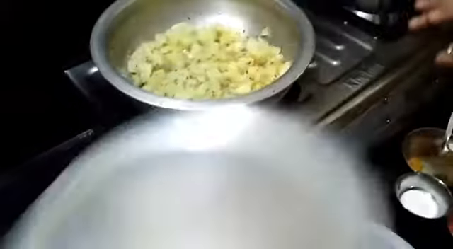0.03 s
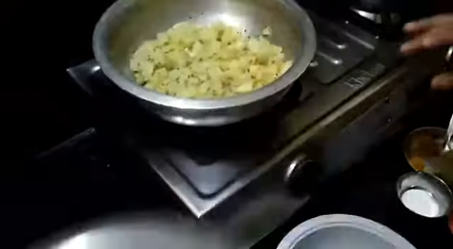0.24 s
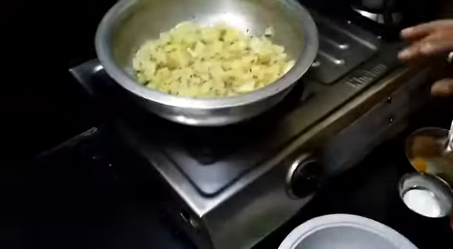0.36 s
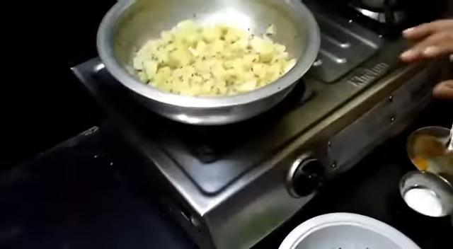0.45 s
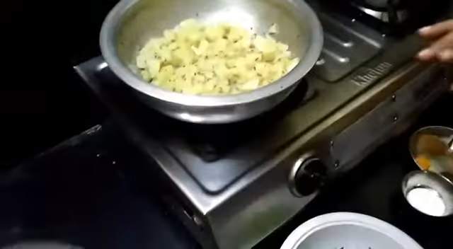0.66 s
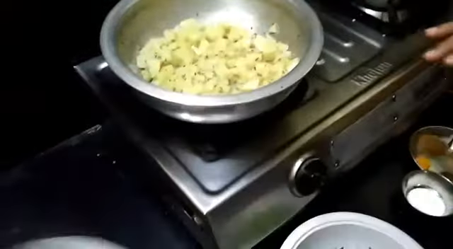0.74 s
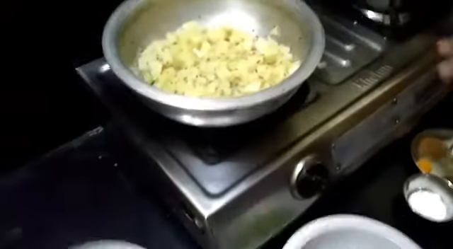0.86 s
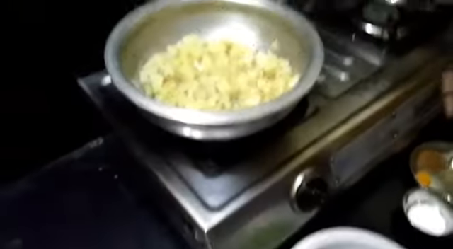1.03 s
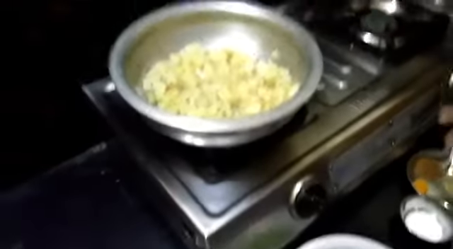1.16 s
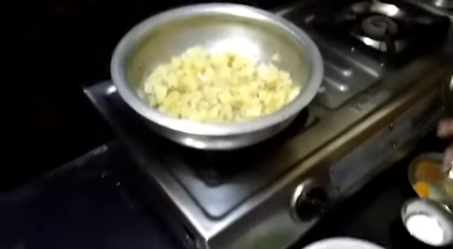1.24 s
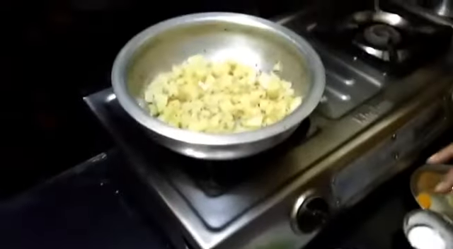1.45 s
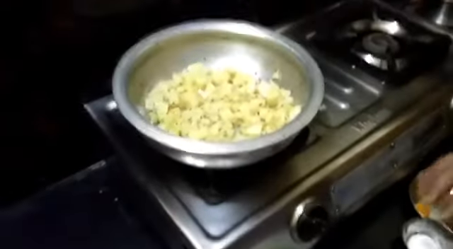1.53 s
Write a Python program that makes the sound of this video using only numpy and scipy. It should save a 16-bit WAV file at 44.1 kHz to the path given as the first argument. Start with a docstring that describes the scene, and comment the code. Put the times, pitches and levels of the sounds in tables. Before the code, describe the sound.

Metal lid clanking loudly against a pan rim, knocking, scraping and landing over a faint sizzle

```python
"""A small, hard-walled kitchen, close microphone: a metal lid comes off a softly sizzling pan.
The lid clanks and rings, knocks and scrapes the pan's rim, then lands on other metalware and slides a little.
Clicks of contact force drive three ringing bodies, each made of decaying modes and dense, decaying noise.
Single notes, a skidding rim and dull bumps join them; the sizzle is coloured noise and tiny crackles.
The room adds a short diffuse tail, and the microphone's limiter flattens each attack."""
import sys
import numpy as np
from scipy import signal
from scipy.fft import rfft, irfft
from scipy.io import wavfile
from scipy.ndimage import uniform_filter1d, minimum_filter1d

SR = 44100
rng = np.random.default_rng(int(sys.argv[2]) if len(sys.argv) > 2 else 0)


def unload_audio(sound):
    """Save the sound as a 16-bit wav file, at the path given as the first command line argument."""
    columns = np.transpose(np.atleast_2d(sound))
    # keep every value between -1 and 1, then stretch to whole-number steps
    steps = np.round(np.clip(columns, -1, 1) * 32767)
    wavfile.write(sys.argv[1], SR, steps.astype(np.int16))


N = 70560
T = np.arange(N) / SR  # time in seconds

# spectrum of the sizzling food over the quiet room: pitch_hz, relative density_db (per Hz)
SIZZLE_SPECTRUM = [(70, -2), (200, -5.5), (450, -14), (1200, -17.5), (3000, -23), (4400, -17), (5500, -7),
                   (6600, -0.5), (8000, -9), (10000, -19.5), (14000, -18)]
HISS_START_DB, CRACKLE_START_DB, SIZZLE_RISE_DB_PER_S = -60.5, -69, 4.5
CRACKLES_PER_S, CRACKLE_SPREAD_DB = 340, 3

# the room's diffuse tail: level, decay by 60 dB, and silence ahead of it
ROOM_DB, ROOM_T60_S, ROOM_GAP_S = -15.5, 0.58, 0.0037

# dull bumps as things are handled: centre_s, half_length_s (down to 1/e), level_db
HANDLING_BUMPS = [(0.761, 0.076, -55.5), (1.011, 0.043, -55)]
BUMP_HZ = 215

# knocks on held or pressed metal, each one note: start_s, pitch_hz, level_db, t60_s
HELD_KNOCKS = [(0.7888, 936, -10.5, 0.012), (1.141, 870, -59.5, 0.44), (1.143, 3520, -59.5, 0.095),
               (1.482, 1966, -41, 0.049)]

# the rim's skid in the first clank: start_s, length_s, from_hz, to_hz, level_db
RIM_SKID = (0.2035, 0.033, 7500, 4400, -17)
SKID_WIDTH_HZ = 950

# modes of the lid, the pan and the metalware under the lid: pitch_hz, level_db, t60_s
LID_MODES = [(972, -18, .5), (1577, -29, 0.47), (4529, -31, 0.46), (5064, -33, 0.5), (6358, -26.5, 0.34),
             (268.5, -34.4, 0.62), (826, -39, 0.56), (1375, -35.5, 0.62), (1903, -30, 0.29),
             (3284, -31, 0.2), (3542, -36.1, 0.33), (4145, -43, 0.35), (4678, -42.5, 0.42),
             (4942, -37, 0.3), (5658, -34.4, 0.3), (6578, -25.5, 0.16), (7138, -33.4, 0.32)]
PAN_MODES = [(1930, -39.5, 0.32), (3260, -41, 0.3), (4000, -28.5, 0.14), (4086, -26, 0.16),
             (267.1, -31.5, 0.24), (535, -36.8, 0.31), (968, -29.5, 0.23), (1380, -36.5, 0.35),
             (2299, -41.4, 0.29), (2560, -40.4, 0.3), (2870, -44, 0.35), (5580, -21.4, 0.13),
             (6450, -26.4, 0.17), (6578, -23.1, 0.21)]
WARE_MODES = [(255, -40, 0.5), (715, -30, 0.3), (807, -29.5, 0.42), (63.2, -57, 1.3), (941, -36.1, 0.25),
              (1410, -33, 0.25), (2540, -32.5, 0.24), (3310, -29.5, 0.19), (4840, -34.5, 0.32),
              (6250, -36.1, 0.34), (6585, -26.1, 0.19), (7060, -28.1, 0.23), (7378, -30.1, 0.23)]
# modes split by the uneven metal: spread_hz (the furthest twins lie at twice this), twin_level_db
LID_SPLIT = (9, -21)
PAN_SPLIT = (24, -1)
WARE_SPLIT = (22, -1)
# spectrum of each body's crowd of weaker modes: pitch_hz, relative density_db (per Hz)
LID_CROWD_SPECTRUM = [(50, -24), (100, -0.5), (260, -4), (500, -2.5), (880, 2.8), (1300, -2), (2300, -8.5),
                      (3400, -4), (4700, -2.9), (6700, 4), (8000, 0.2), (9600, -6.9), (14000, -14.5)]
PAN_CROWD_SPECTRUM = [(35, -24), (70, -15), (230, 2), (450, -1.4), (850, 3), (1600, -13), (3400, -4.5),
                      (5600, 4), (6700, 9), (8000, -2), (9600, -7.5), (14000, -10.6)]
WARE_CROWD_SPECTRUM = [(40, -30), (100, -7), (400, -19), (800, -4), (1300, -5), (1700, -6.5), (3700, -6),
                       (5000, -0.4), (7000, 2.5), (8200, -4.5), (9600, -12), (14000, -21)]
# decay of each crowd: level_db, bass_t60_s, treble_t60_s
LID_CROWD_DECAY = (-19.5, 0.68, 0.17)
PAN_CROWD_DECAY = (-17, 0.35, 0.1)
WARE_CROWD_DECAY = (-19.5, 0.41, 0.21)
BLOOM_S = 0.017  # time constant with which the clear modes build up

# blows: start_s, lid_level_db, pan_level_db, ware_level_db, low_end_db
CONTACT_BLOWS = [(0.2036, 6.5, -38, -77, -13), (0.7887, -35, 4.3, -41, -3.3), (0.838, -22, -6.5, -60, -0.5),
                 (0.851, -17, -6, -44, -13), (0.865, -26, -11, -15, -4.3), (1.142, -46, -25, -34.5, -12.5),
                 (1.227, -31, -43, -19.5, -5), (1.2548, -17.5, -10.5, 0.65, -2.5),
                 (1.358, -36, -55, -31, -4), (1.481, -54, -30, -22.5, -1.8)]
# scrapes: start_s, length_s, lid_level_db, pan_level_db, ware_level_db, low_end_db
CONTACT_SCRAPES = [(0.211, 0.023, -10, -10, -10, -17), (0.8, 0.023, -26.5, -18.5, -49, 4),
                   (0.822, 0.047, -18, -6, -8, -5), (1.13, 0.013, -59, -35.5, -36, -24),
                   (1.257, 0.066, -20, -12.5, -14, -1.4), (1.374, 0.11, -72, -42.5, -30.5, 7.5),
                   (1.436, 0.16, -48, -18.5, -15, -7.5)]
SLIPS_PER_S, SLIP_SPREAD_DB = 600, 5
LOW_END_HZ = 4250  # corner below which low_end_db acts

# microphone and limiter
CEILING_DB, RELEASE_DB_PER_S, LIMITER_ATTACK_S = -11.5, 294, 0.00035
LOW_CUT_HZ, CUTOFF_HZ = 41, 14350


def from_db(db):
    """Decibels to gain."""
    return 10 ** (np.asarray(db) / 20)


def rms_one(x):
    """Scale to unit power."""
    return x / np.sqrt(np.mean(x ** 2) + 1e-20)


def convolve(x, response):
    """Pass a signal through an impulse response."""
    return signal.fftconvolve(x, response)[:N]


def filtered(x, order, hz, kind="low"):
    """Butterworth filter."""
    return signal.sosfilt(signal.butter(order, hz, kind, fs=SR, output="sos"), x)


def swell(along):
    """Rise and fall of a rubbing contact as it goes from 0 to 1."""
    return np.sqrt(np.abs(np.sin(np.pi * along)))


def colour(x, spectrum):
    """Give a signal a spectrum, at unit power."""
    hz, db = np.transpose(spectrum)
    bins = np.maximum(np.arange(N // 2 + 1) * SR / N, 1)
    gain = from_db(np.interp(np.log(bins), np.log(hz), db))
    return rms_one(irfft(rfft(x) * gain, N))


def clicks(rate, spread_db):
    """Randomly timed clicks of uneven size and sign."""
    sizes = from_db(spread_db * np.minimum(rng.exponential(1, N), 4))
    return (rng.random(N) < rate / SR) * sizes * rng.choice([-1, 1], N)


def sizzle():
    """Faint hiss with tiny crackles of the same colour, rising steadily in level."""
    hiss = from_db(HISS_START_DB) * colour(rng.standard_normal(N), SIZZLE_SPECTRUM)
    pops = clicks(CRACKLES_PER_S, CRACKLE_SPREAD_DB)
    crackle = from_db(CRACKLE_START_DB) * colour(pops, SIZZLE_SPECTRUM)
    return (hiss + crackle) * from_db(SIZZLE_RISE_DB_PER_S * T)


def kitchen(x):
    """The short diffuse tail of a small hard room: decaying noise after a brief gap."""
    tail = rng.standard_normal(N) * from_db(-60 * T / ROOM_T60_S) * (T > ROOM_GAP_S)
    return from_db(ROOM_DB) * convolve(x, rms_one(tail) / np.sqrt(N))


def handling():
    """Soft low bumps as things are moved: band-limited noise that swells and fades."""
    rumble = filtered(rng.standard_normal(N), 2, [BUMP_HZ * 0.59, BUMP_HZ * 1.3], "band")
    level = sum(from_db(db) * np.exp(-((T - centre) / half) ** 2) for centre, half, db in HANDLING_BUMPS)
    return rms_one(rumble) * level


def knocks():
    """Where the metal is held or pressed, a knock gives one decaying note."""
    out = np.zeros(N)
    for start, hz, db, t60 in HELD_KNOCKS:
        age = np.maximum(T - start, 0)
        out += from_db(db - 60 * age / t60) * np.sin(2 * np.pi * hz * age)
    return out


def zing():
    """Rim skids along rim: a narrow band of friction noise that falls as the skid slows."""
    start, length, from_hz, to_hz, db = RIM_SKID
    along = np.clip((T - start) / length, 0, 1)
    grain = filtered(rng.standard_normal((2, N)), 2, SKID_WIDTH_HZ / 2)
    phase = 2 * np.pi * np.cumsum(from_hz + (to_hz - from_hz) * along) / SR
    band = rms_one(grain[0] * np.cos(phase) + grain[1] * np.sin(phase))
    return from_db(db) * band * swell(along)


def contacts():
    """Force on lid, pan and metalware: one click a blow, a swell of tiny slips a scrape."""
    touches = []
    for start, *levels in CONTACT_BLOWS:
        touches.append((1.0 * (np.arange(N) == int(start * SR)), levels))
    for start, length, *levels in CONTACT_SCRAPES:
        along = np.clip((T - start) / length, 0, 1)
        slips = clicks(SLIPS_PER_S, SLIP_SPREAD_DB) * swell(along)
        touches.append((rms_one(slips) / np.sqrt(N), levels))  # same energy as one click
    force = np.zeros((3, N))
    for touch, (lid_db, pan_db, ware_db, low_db) in touches:
        # each contact has its own share of bass, thinner or fuller
        lows = filtered(touch + 1e-18, 1, LOW_END_HZ)
        shaped = touch + (from_db(low_db) - 1) * lows
        force += np.outer(from_db([lid_db, pan_db, ware_db]), shaped)
    return force


def body(modes, split, crowd, decay):
    """A metal body's answer to a tap: clear modes with close twins, and a dense crowd whose treble dies first."""
    spread_hz, twin_db = split
    crowd_db, bass_t60, treble_t60 = decay
    out = np.zeros(N)
    for hz, db, t60 in modes:
        twins = np.zeros(N)
        for offset, turn in rng.uniform(-2, 2, size=(7, 2)):
            twin_hz = hz + spread_hz * offset * min(1, hz / 1000)  # low modes split less
            twins += np.sin(2 * np.pi * (twin_hz * T + turn)) / np.sqrt(7)
        ring = np.sin(2 * np.pi * hz * T) + from_db(twin_db) * twins
        out += from_db(db - 60 * T / t60) * ring
    out *= 1 - np.exp(-T / BLOOM_S)
    dense = rfft(colour(rng.standard_normal(N), crowd))
    bins = np.arange(len(dense)) * SR / N
    edges = [0, 350, 700, 1400, 2800, 5000, 8000, SR]  # Hz, bands that decay separately
    t60s = np.geomspace(bass_t60, treble_t60, len(edges) - 1)
    for low, high, t60 in zip(edges, edges[1:], t60s):
        band = irfft(dense * ((bins >= low) & (bins < high)), N)
        out += band * from_db(crowd_db - 60 * T / t60)
    return out


def metal():
    """Each body rings with the force that reaches it."""
    on_lid, on_pan, on_ware = contacts()
    lid = convolve(on_lid, body(LID_MODES, LID_SPLIT, LID_CROWD_SPECTRUM, LID_CROWD_DECAY))
    pan = convolve(on_pan, body(PAN_MODES, PAN_SPLIT, PAN_CROWD_SPECTRUM, PAN_CROWD_DECAY))
    ware = convolve(on_ware, body(WARE_MODES, WARE_SPLIT, WARE_CROWD_SPECTRUM, WARE_CROWD_DECAY))
    return lid + pan + ware


def scene():
    """Clanks and their room over the sizzle and the handling bumps."""
    clanks = metal() + knocks() + zing()
    return (sizzle() + handling() + kitchen(clanks) + clanks)[None]


def record(dry):
    """A fast limiter holds the peaks down and recovers steadily; the deep bass and the top are cut."""
    dry = filtered(dry, 2, LOW_CUT_HZ, "high")
    over_db = np.maximum(20 * np.log10(np.abs(dry) + 1e-9) - CEILING_DB, 0)
    # each peak's reduction recovers along a straight line in dB
    recovery_db = RELEASE_DB_PER_S * T
    held_db = np.maximum.accumulate(over_db + recovery_db, axis=-1) - recovery_db
    # the gain starts down just ahead of a peak
    width = max(int(LIMITER_ATTACK_S * SR), 1)
    gain_db = uniform_filter1d(minimum_filter1d(-held_db, 2 * width), width)
    top_cut = signal.ellip(10, .2, 70, CUTOFF_HZ, fs=SR, output="sos")
    return signal.sosfilt(top_cut, dry * from_db(gain_db))


dry = scene()
out = record(dry)
unload_audio(out)
```